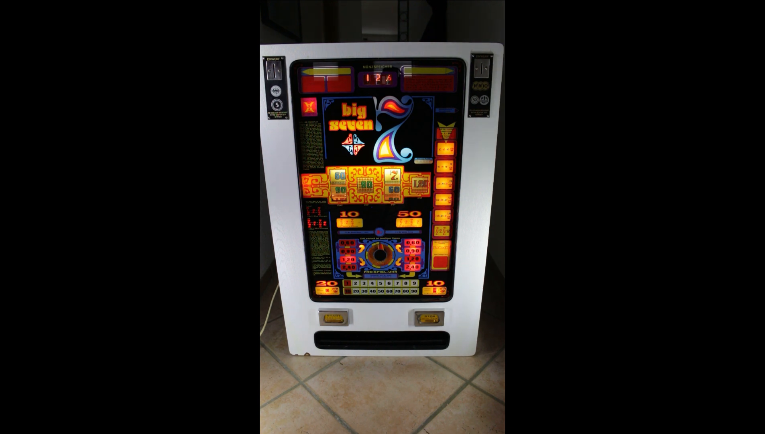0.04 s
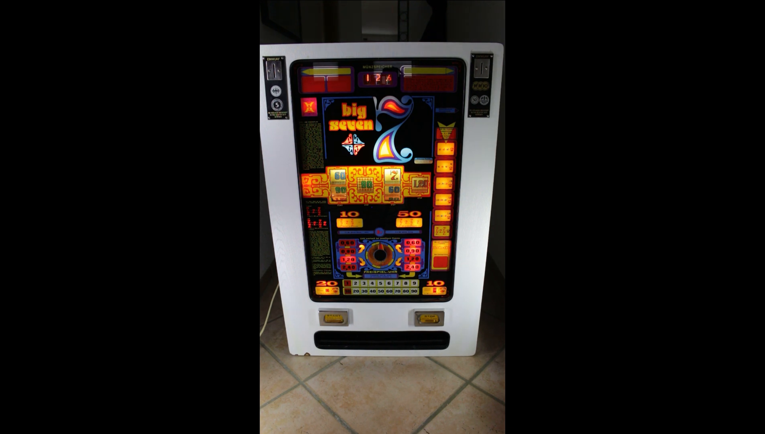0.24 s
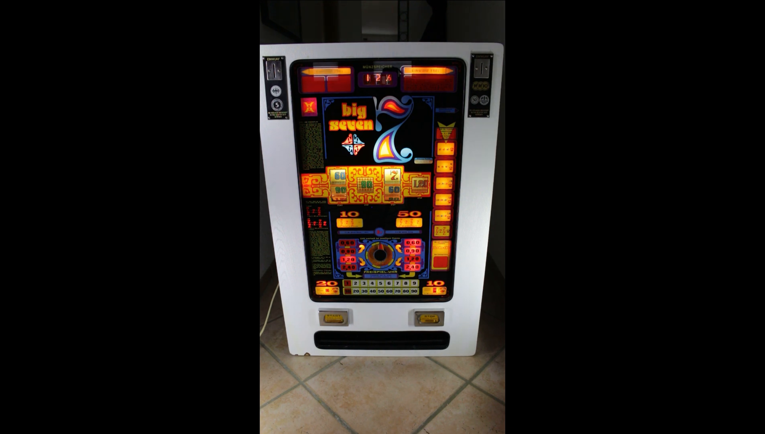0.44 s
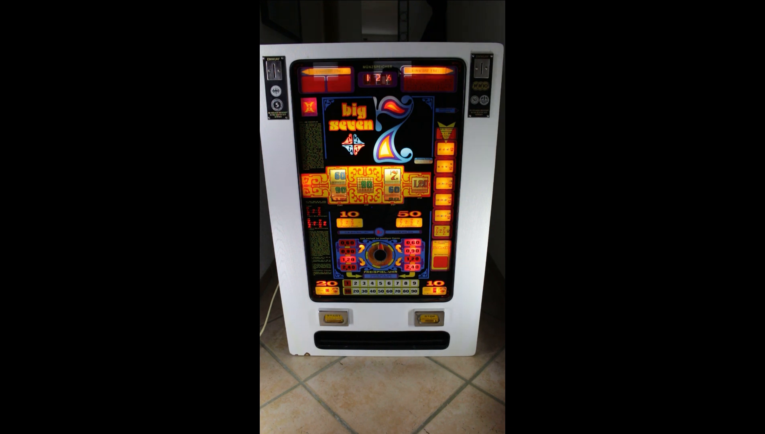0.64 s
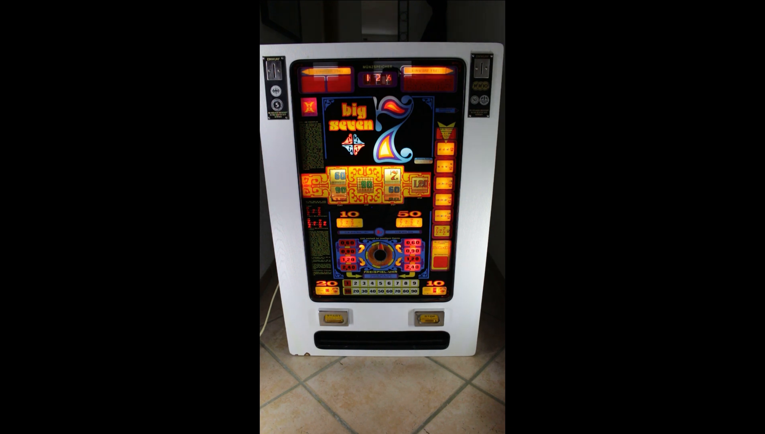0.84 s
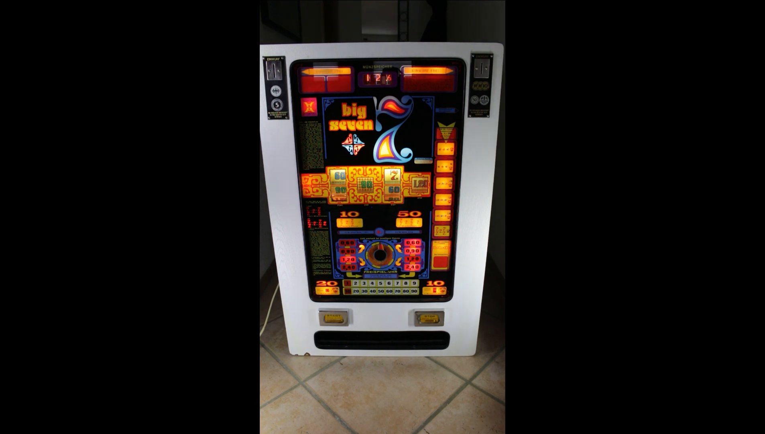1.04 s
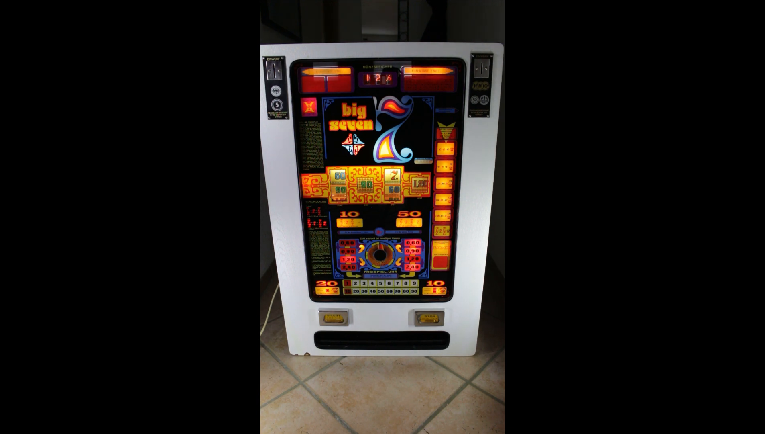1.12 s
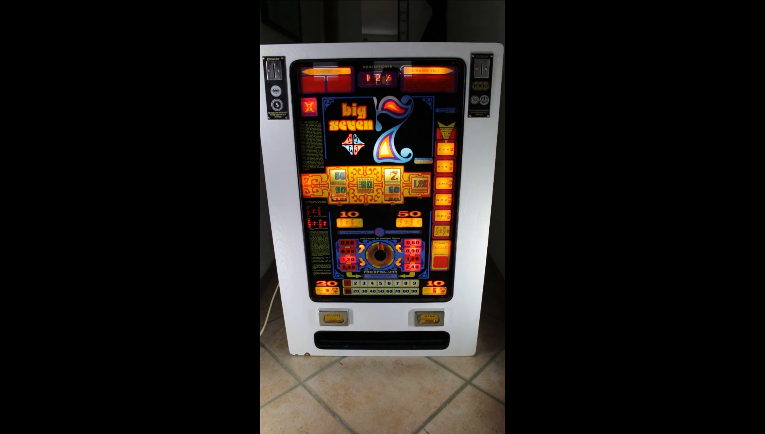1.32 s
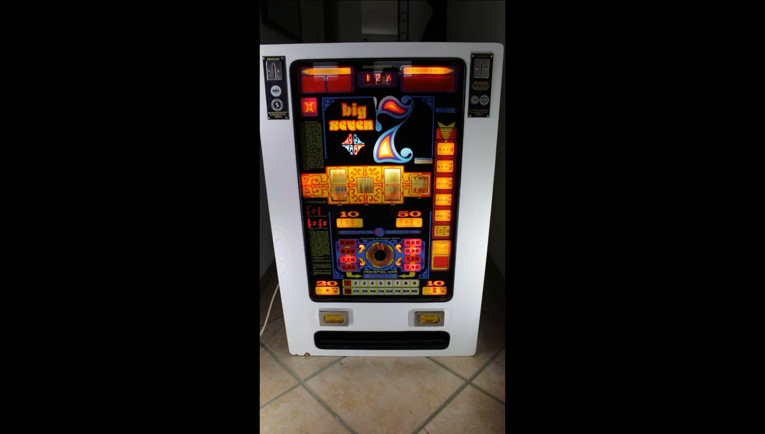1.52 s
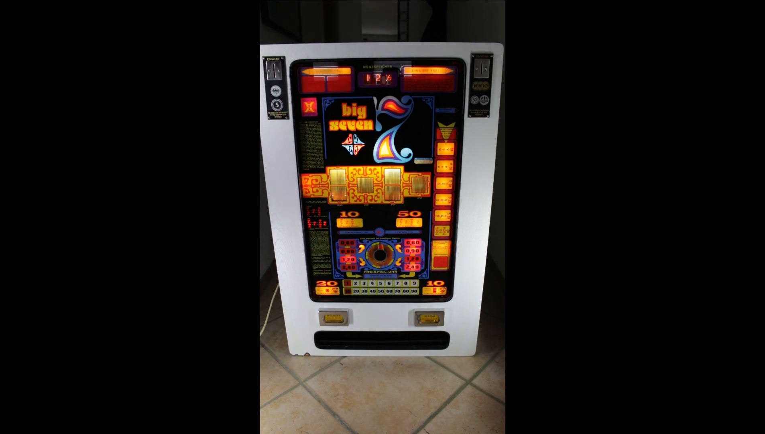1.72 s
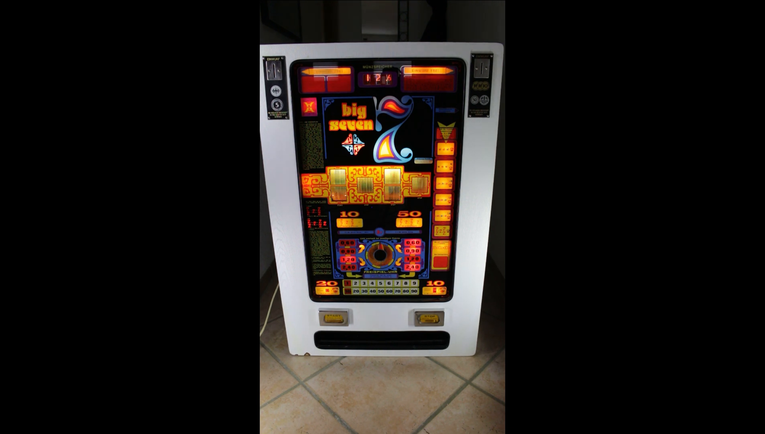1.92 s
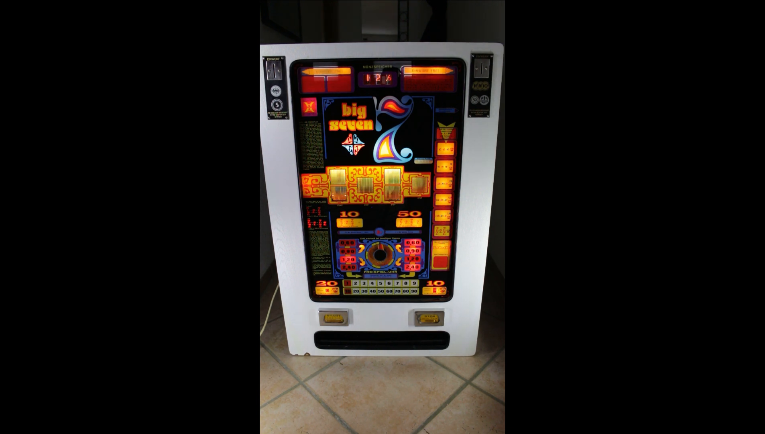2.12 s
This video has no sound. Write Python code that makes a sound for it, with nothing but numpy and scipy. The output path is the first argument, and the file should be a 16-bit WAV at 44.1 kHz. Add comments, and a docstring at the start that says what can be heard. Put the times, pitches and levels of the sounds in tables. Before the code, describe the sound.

Slot machine clacks sharply twice amid light clicks, then its reels start whirring.

```python
"""A slot machine in a small tiled room. Over a bed of air, rumble and low hum, switches start clicking
inside the cabinet, with pinging springs and dull lever knocks. A heavy latch slams, chatters and rings
the panels, and the clicks carry on. The reel motors fade up as a second, boxier clack releases the
reels, which whirr and whine to the end under a few last clicks. Every blow rattles the cabinet briefly
and dies away in the room."""
import sys
import numpy as np
from scipy import signal
from scipy.fft import irfft
from scipy.io import wavfile
from scipy.ndimage import uniform_filter1d

SR = 44100
rng = np.random.default_rng(int(sys.argv[2]) if len(sys.argv) > 2 else 0)


def wav_record(signal):
    """Record a signal, one row per channel, as 16-bit PCM in the file named by sys.argv[1]."""
    frames = np.transpose(np.atleast_2d(signal))
    bounded = np.clip(frames, -1, 1)
    # unit amplitude maps onto the largest positive 16-bit level
    quanta = np.round(bounded * 32767).astype(np.int16)
    wavfile.write(sys.argv[1], SR, quanta)


N = 94815
TIME = np.arange(SR) / SR  # the one-second span of a single hit

# Reverb time of the tiled room (frequency [Hz], t60 [s])
ROOM_DECAY = [(120, 0.83), (300, 0.69), (1000, 0.65), (3000, 0.58), (7000, 0.5), (14000, 0.42)]
# Stereo image, tight in the low mids and wide on top (frequency [Hz], left-right likeness [0-1])
COHERENCE = [(60, 0.65), (180, 0.88), (550, 0.89), (1650, 0.48), (4970, 0.31), (15000, 0.038)]


def amp(db):
    """Decibels to gain."""
    return 10 ** (np.asarray(db) / 20)


def unit_rms(x):
    """Scales to rms 1."""
    return x / np.sqrt(np.mean(x ** 2) + 1e-20)


def read(points, hz):
    """Reads a curve on a log-frequency axis."""
    f, value = np.transpose(points)
    return np.interp(np.log(hz + 1), np.log(np.maximum(f, 0) + 1), value)


def add(mix, s, sound):
    """Lays a stereo sound into the mix at s seconds."""
    part = mix[:, max(round(s * SR), 0):][:, :sound.shape[1]]
    part += sound[:, :part.shape[1]]


def fade(t, t60):
    """Exponential decay, 60 dB down at t60."""
    return np.exp(-np.log(1000) * t / np.maximum(t60, 1e-3))


def pan(hz):
    """Left and right gains: the bass leans right, the top sits near the centre."""
    # Stereo balance (frequency [Hz], left minus right [dB])
    balance = [(60, -13), (180, -12.5), (550, -10.5), (1650, -7), (4970, -3), (15000, 0)]
    ratio = amp(read(balance, np.atleast_1d(hz)))
    return 2 * np.array([ratio, np.ones_like(ratio)]) / (1 + ratio)


def noise(gain, size, right_delay_s=.00002):
    """Stereo noise coloured by gain(hz), with rms 1 in mono; it reaches the left side first."""
    hz = np.fft.rfftfreq(size, 1 / SR)
    common, diffuse = np.exp(2j * np.pi * rng.random((2, len(hz))))
    likeness = np.clip(read(COHERENCE, hz), 0, 1)
    delay = np.exp(-2j * np.pi * hz * right_delay_s)
    right = likeness * common * delay + np.sqrt(1 - likeness ** 2) * diffuse
    x = irfft(np.array([common, right]) * gain(hz) * pan(hz), size)
    return x / x.mean(0).std()


def band(centre_hz, width_hz, size):
    """Noise in one steep resonance."""
    return noise(lambda hz: 1 / (1 + (2 * (hz - centre_hz) / width_hz) ** 2), size)


def drone(lines, waver_rad, fastest_hz):
    """Steady tones whose phase wavers slowly."""
    t = np.arange(N) / SR
    rates = fastest_hz * np.geomspace(.1, 1, 8)
    out = np.zeros((2, N))
    for hz, db in lines:
        drift = unit_rms(sum(np.sin(2 * np.pi * (r * t + rng.random())) for r in rates))
        out += pan(hz) * amp(db) * np.sqrt(2) * np.sin(2 * np.pi * hz * t + waver_rad * drift)
    return out


def room_tone():
    """The bed: soft air, a narrow rumble and a low hum."""
    # Colour of the room's air (frequency [Hz], relative level [dB])
    air_tone = [(76, -22.5), (130, -6.5), (252, -9.5), (415, -12), (1040, -16), (1170, -18), (1620, -21),
                (3390, -25.5), (15500, -37.5)]
    # The hum's single tone (frequency [Hz], level [dB])
    hum = [(100, -56)]
    air = amp(-53.5) * noise(lambda hz: amp(read(air_tone, hz)), N)
    rumble = amp(-56) * band(centre_hz=83.6, width_hz=22, size=N)
    return air + rumble + drone(hum, waver_rad=0.79, fastest_hz=4.1)


def ripple(depth_db=2.5, spacing_hz=110, above_hz=1200):
    """Each blow lands on another spot and wakes its own mix of fine metallic resonances."""
    grid = np.arange(0, SR / 2, spacing_hz)
    heights = rng.standard_normal(len(grid))
    return lambda hz: amp(depth_db * np.interp(hz, grid, heights) * hz / (hz + above_hz))


def blow(tone, bass_db, treble_db, rattle_t60, room_db, low_cut_hz, rise_s):
    """An uneven rattle in the cabinet, then the room's tail, whose highs die first."""
    fine = ripple()
    x = noise(lambda hz: amp(read(tone, hz)) * fine(hz) * hz ** 2 / np.hypot(hz ** 2, low_cut_hz ** 2),
              SR)
    hz, t, spectrum = signal.stft(x, SR, nperseg=256)
    hz = hz[:, None]
    bass_shelf = 1 / (1 + (hz / 550) ** 2)
    treble_shelf = hz ** 2 / (hz ** 2 + 3000 ** 2)
    chatter_db = 0.5 * rng.standard_normal(len(t))
    colour = amp(bass_db * bass_shelf + treble_db * treble_shelf + chatter_db)
    rattle = fade(t, rattle_t60)
    tail = amp(room_db) * (1 - np.exp(-t / 0.026)) * fade(t, read(ROOM_DECAY, hz))
    x = signal.istft(spectrum * colour * np.hypot(rattle, tail), SR, nperseg=256)[1][:, :SR]
    return x * np.minimum(TIME / rise_s, 1)


def snap(grain_db=4):
    """Metal meets metal: an instant burst of tiny hard contacts."""
    # Bright colour of the contact (frequency [Hz], relative level [dB])
    tone = [(1000, -11), (3500, 4.5), (11000, -6), (15500, -24)]
    flicker = unit_rms(uniform_filter1d(rng.standard_normal(SR), size=24))
    grain = unit_rms(amp(grain_db * np.clip(flicker, -2, 2)))
    return noise(lambda hz: amp(read(tone, hz)), SR) * grain * fade(TIME, t60=.04)


def lever(centre_hz, octaves, rise_s=0.0068):
    """A knock on the levers; it favours the resonances near its centre pitch."""
    # Lever resonances (frequency [Hz], width [Hz], relative level [dB])
    modes = [(337, 65, 4), (517, 60, -5), (733, 120, -7), (1086, 61, -5), (1440, 105, -8),
             (1852, 180, -16.5), (4440, 670, -16)]

    def gain(hz):
        power = sum(amp(db) ** 2 / (1 + (2 * (hz - f) / width) ** 2) ** 2 for f, width, db in modes)
        return np.sqrt(power) / (1 + (np.log2((hz + 1) / centre_hz) / octaves) ** 2)
    tail = amp(-17) * fade(TIME, read(ROOM_DECAY, centre_hz))
    decay = np.hypot(fade(TIME, t60=0.19), tail)
    return noise(gain, SR) * decay * (1 - np.exp(-TIME / rise_s))


def switches():
    """Light clicks, each with the ping of a small spring, and the duller knocks of their levers."""
    # Switch clicks (time [s], level [dB], bass [dB], treble [dB], relative spring ping [dB])
    clicks = [(.093, -43, 4, 6, -30), (0.113, -46.5, 16, 11.5, -21), (0.143, -42, 6, 7.5, -5),
              (0.163, -38.5, -2, 2.5, -1.5), (0.429, -35.5, 6, 1, -12), (.678, -36, -6.5, -0.5, -27),
              (0.702, -35, -0.5, 0, -8.5), (0.851, -40.5, 6, 4.5, -6), (0.924, -40, 1, 3, -12),
              (1.261, -35.5, -8.5, -5.5, -30), (1.284, -41.5, 7.5, 2.5, -24), (1.91, -39, 3, 0.5, -31),
              (2.084, -58.5, -20, 13.5, -17)]
    # Colour of a click's body (frequency [Hz], relative level [dB])
    tone = [(88, -41), (150, -12), (326, 3.5), (595, -11.5), (736, -7.5), (844, -10.5), (1420, -10),
            (2920, -21.5), (4060, -18), (6350, -27.5), (7270, -22), (8010, -24.5), (15500, -46)]
    # Knocks of the levers behind the switches (time [s], level [dB], centre [Hz])
    knocks = [(0.115, -38, 1220), (.170, -32.5, 720), (.333, -24, 616), (0.707, -36, 470),
              (0.855, -35, 654), (0.937, -38.5, 800), (1.266, -40, 2030), (1.296, -36, 350),
              (1.912, -40.5, 1420)]
    out = np.zeros((2, N))
    ping_envelope = fade(TIME, t60=0.091) * np.minimum(TIME / 0.0027, 1)
    for s, db, bass_db, treble_db, ping_db in clicks:
        body = blow(tone, bass_db, treble_db, rattle_t60=0.19, room_db=-5.5, low_cut_hz=256, rise_s=.002)
        ping = amp(ping_db) * band(centre_hz=7270, width_hz=430, size=SR) * ping_envelope
        edge = amp(treble_db - 7) * snap()
        knock = amp(-5.5) * lever(centre_hz=1830, octaves=1.2)
        add(out, s, amp(db) * (body + ping + edge + knock))
    for s, db, hz in knocks:
        add(out, s, amp(db) * lever(hz, octaves=0.34))
    return out


def panel_ring(modes, rise_s):
    """Struck panels ring in decaying tones; the high modes drift furthest out of step left to right."""
    out = np.zeros((2, SR))
    for hz, db, t60 in modes:
        turns = hz * TIME + rng.random()
        spread = rng.normal(size=(2, 1)) * (1 - read(COHERENCE, hz)) / 6
        out += pan(hz) * amp(db) * np.sin(2 * np.pi * (turns + spread)) * fade(TIME, t60)
    return out * (1 - np.exp(-TIME / rise_s))


def latch(ring_t60=0.7):
    """The heavy latch slams, chatters and sets the panels ringing."""
    # First contact, slam and rebounds (time [s], level [dB], bass [dB], treble [dB])
    hits = [(.228, -19, 0, 3.5), (.238, -14, 4, 5.5), (.245, -16, -10.5, 7), (.298, -17, -35, -1),
            (.337, -25.5, -6.5, -10)]
    # Colour of the slam (frequency [Hz], relative level [dB])
    tone = [(35, -64), (60, -30), (102, -4), (183, -19.5), (220, 0), (253, -8), (359, -3), (394, -6),
            (599, -5), (1150, -10), (1520, -5.5), (2710, -19), (3120, -13.5), (4630, -15), (5200, -22.5),
            (8090, -26.5), (15500, -57)]
    # Hard snaps on the attack (time [s], level [dB])
    snaps = [(0.2294, -24.5), (0.2402, -23.5)]
    # Panel modes woken by the slam (frequency [Hz], relative level [dB])
    modes = [(223, -2.5), (360, -0.5), (598, -1.5), (901, -1.5), (965, -9.5), (1306, -4.5), (1495, 4),
             (1553, -4), (1613, -2.5), (1721, -6.5), (1812, -5.5), (2264, -13), (3186, -2.5), (3222, -10.5),
             (4287, -7)]
    out = np.zeros((2, N))
    for s, db, bass_db, treble_db in hits:
        hit = blow(tone, bass_db, treble_db, rattle_t60=0.092, room_db=-7, low_cut_hz=159, rise_s=0.0058)
        add(out, s, amp(db) * hit)
    for s, db in snaps:
        add(out, s, amp(db) * snap())
    slam_s = hits[1][0]
    ring = panel_ring([(hz, db, ring_t60) for hz, db in modes], rise_s=0.00025)
    add(out, slam_s, amp(-29.5) * ring)
    return out


def reel_motors(start_s=1.24, rise_s=0.3, whine_hz=1910, wander=.007, wanders_per_s=50):
    """A low buzz fades up with a whirr and a wandering whine that both pulse with the motor steps."""
    # Motor buzz, the step rate first (frequency [Hz], level [dB])
    buzz_lines = [(48.4, -56), (96.9, -56), (145.3, -57), (279.9, -60)]
    # Colour of the spinning reels (frequency [Hz], relative level [dB])
    tone = [(120, -19), (270, 5), (560, -13), (860, -6), (1290, -23), (1600, -5.5), (2100, -6), (3370, -21),
            (7010, -23), (15500, -42)]
    t = np.arange(N) / SR
    steps = 1 + 0.35 * np.cos(2 * np.pi * buzz_lines[0][0] * t)
    whirr = amp(-52.5) * noise(lambda hz: amp(read(tone, hz)) * hz ** 2 / (hz ** 2 + 130 ** 2), N)
    knots = np.arange(0, t[-1] + 1, 1 / wanders_per_s)
    pitch = whine_hz * (1 + wander * np.interp(t, knots, rng.standard_normal(len(knots))))
    whine = amp(-58.5) * pan(whine_hz) * np.sqrt(2) * np.sin(2 * np.pi * np.cumsum(pitch) / SR)
    buzz = drone(buzz_lines, waver_rad=0.41, fastest_hz=4.38)
    fade_in = np.clip((t - start_s) / rise_s, 0, 1)
    return fade_in * ((whirr + whine) * steps + buzz)


def reel_release():
    """A snap and a bright scrape, then the reel brake drops with a boxy thud."""
    # Scrape, two-part drop and rebound (time [s], level [dB], bass [dB], treble [dB])
    hits = [(1.398, -27, -18, 6), (1.411, -20, -2.5, -4.5), (1.419, -20.5, -3.5, -6.5), (1.477, -31, 4, -6)]
    # Colour of the thud (frequency [Hz], relative level [dB])
    tone = [(35, -51), (60, -5), (179, -16), (230, -4), (310, -10.5), (400, -9), (559, -15), (599, -17),
            (738, -9.5), (1020, -22.5), (1100, -16.5), (3190, -22), (4630, -18.5), (10900, -32.5),
            (15500, -46)]
    # Panel modes woken by the drop (frequency [Hz], relative level [dB], t60 [s])
    modes = [(218.2, -6.5, 0.51), (274, -1.5, 0.38), (367.7, -3.5, 0.25), (407, -7, 0.31),
             (542, -18.5, 0.77), (659, -18, 0.28), (1105, -12.5, 0.31), (1833, -13, .35)]
    out = np.zeros((2, N))
    for s, db, bass_db, treble_db in hits:
        hit = blow(tone, bass_db, treble_db, rattle_t60=.19, room_db=-8.5, low_cut_hz=147, rise_s=.0037)
        add(out, s, amp(db) * hit)
    scrape_s, drop_s = hits[0][0], hits[2][0]
    add(out, scrape_s, amp(-30) * snap())
    add(out, drop_s, amp(-22) * panel_ring(modes, rise_s=0.00042))
    return out


def scene():
    """The mechanism plays over the room tone."""
    return room_tone() + switches() + latch() + reel_motors() + reel_release()


def record(dry):
    """A soft limiter rounds off the highest peaks and a steep low-pass trims the very top."""
    ceiling, cutoff_hz = .8, 15400
    limited = dry / (1 + (dry / ceiling) ** 4) ** .25
    low_pass = signal.firwin(511, cutoff_hz, window=("kaiser", 9), fs=SR)
    return signal.oaconvolve(limited, low_pass[None], "same")


dry = scene()
out = record(dry)
wav_record(out)
```